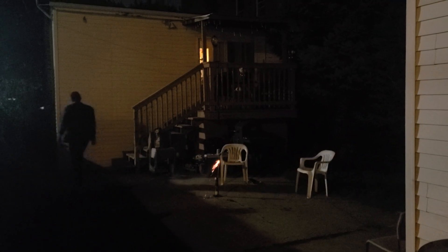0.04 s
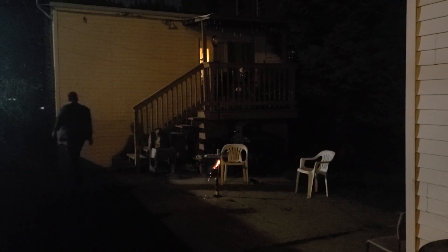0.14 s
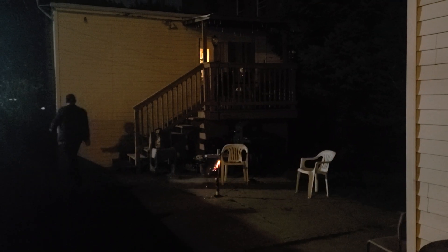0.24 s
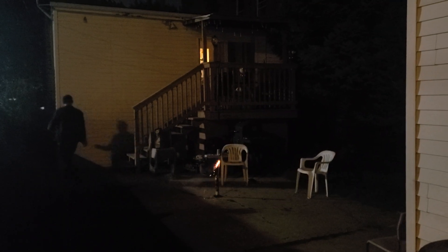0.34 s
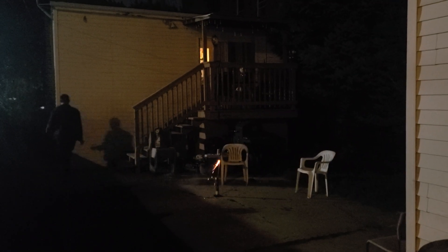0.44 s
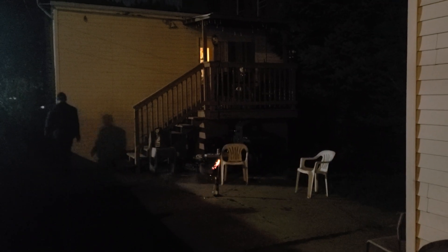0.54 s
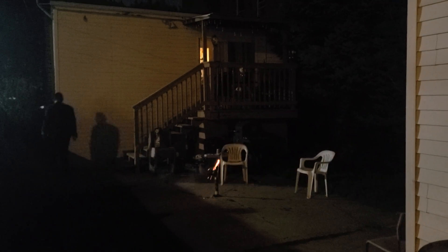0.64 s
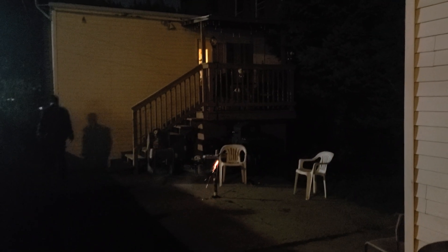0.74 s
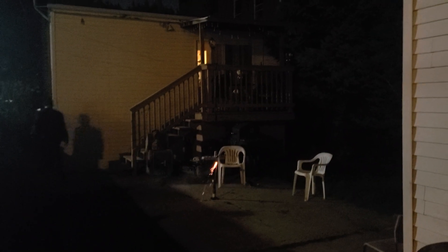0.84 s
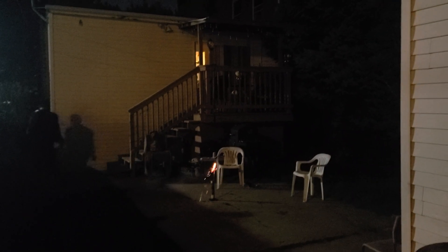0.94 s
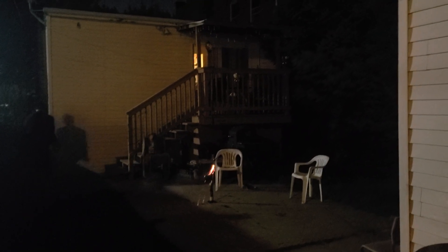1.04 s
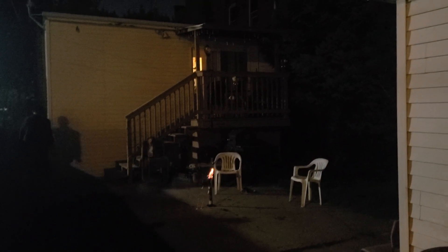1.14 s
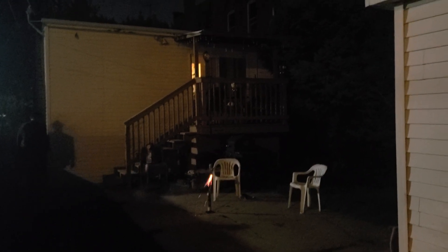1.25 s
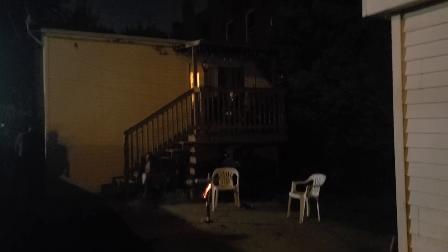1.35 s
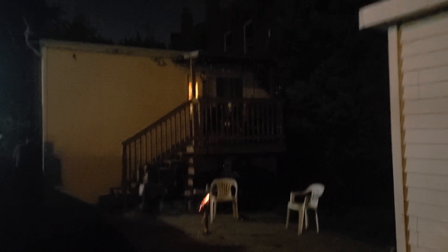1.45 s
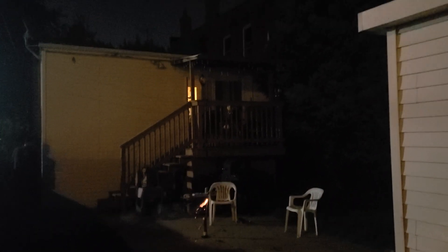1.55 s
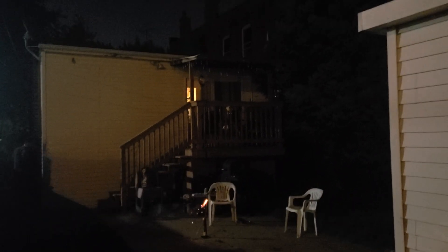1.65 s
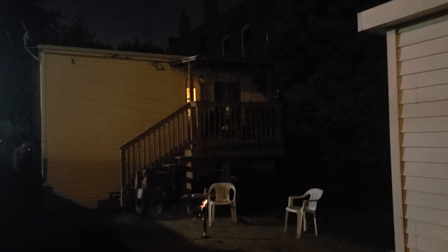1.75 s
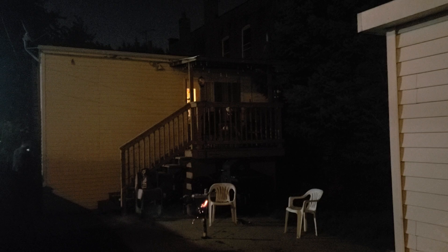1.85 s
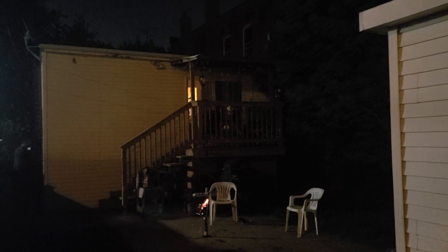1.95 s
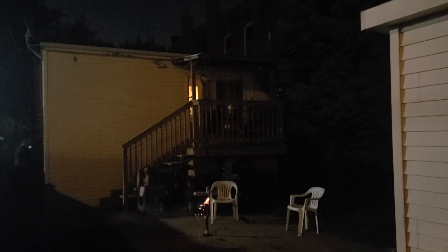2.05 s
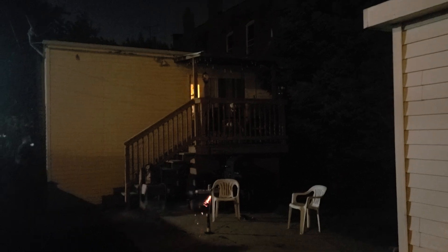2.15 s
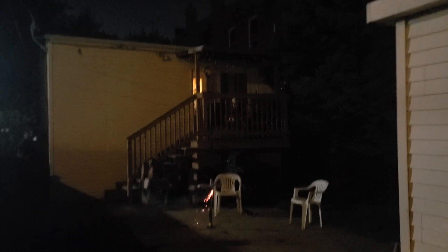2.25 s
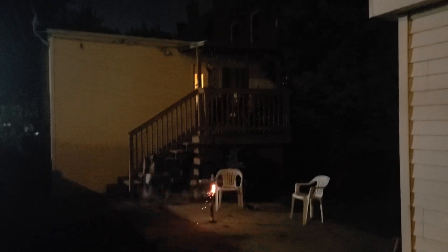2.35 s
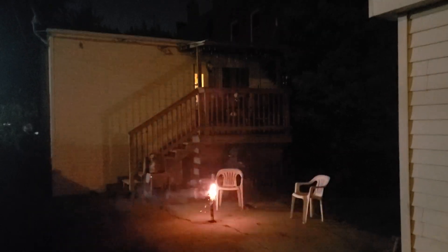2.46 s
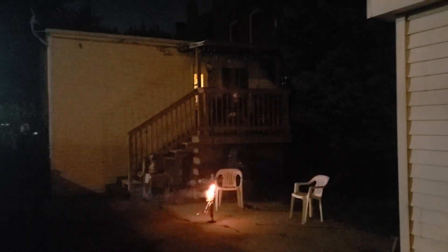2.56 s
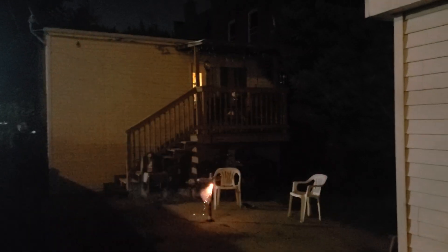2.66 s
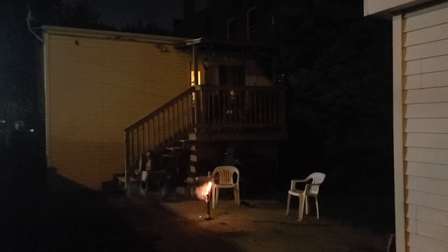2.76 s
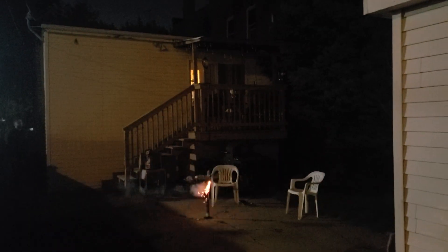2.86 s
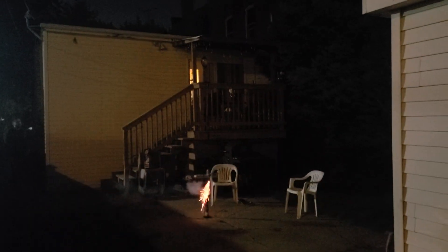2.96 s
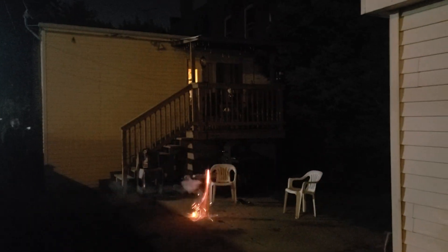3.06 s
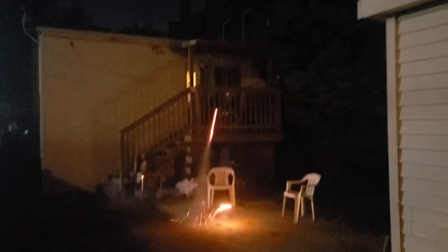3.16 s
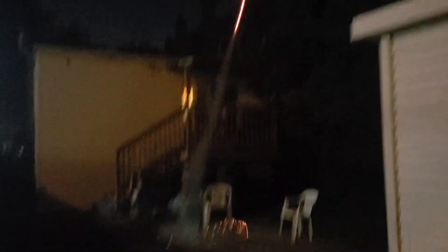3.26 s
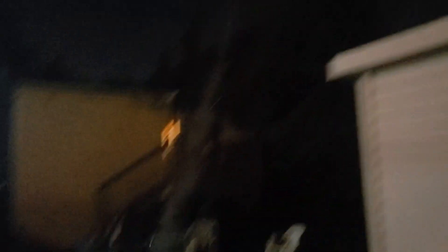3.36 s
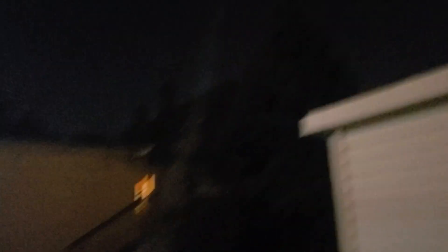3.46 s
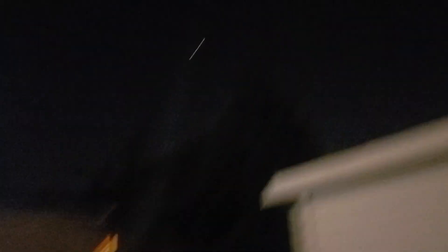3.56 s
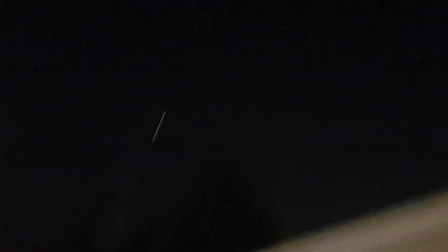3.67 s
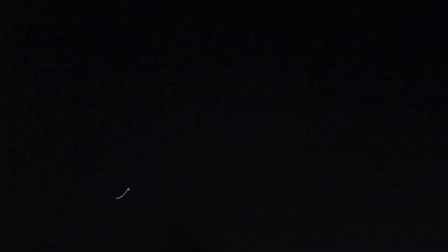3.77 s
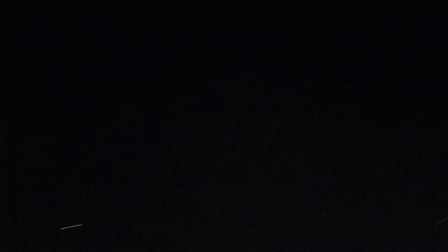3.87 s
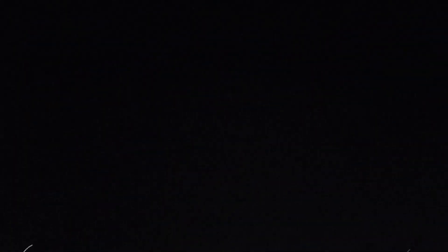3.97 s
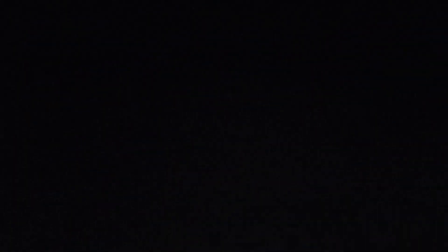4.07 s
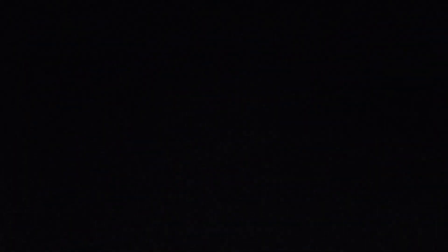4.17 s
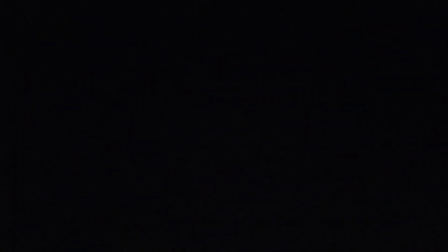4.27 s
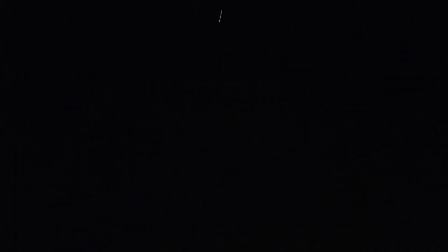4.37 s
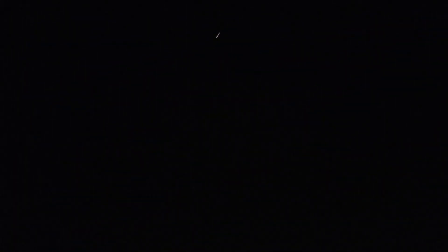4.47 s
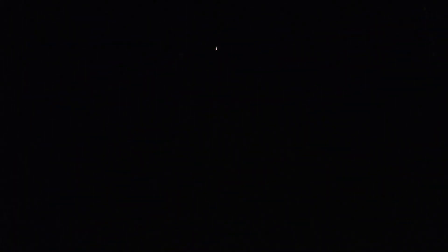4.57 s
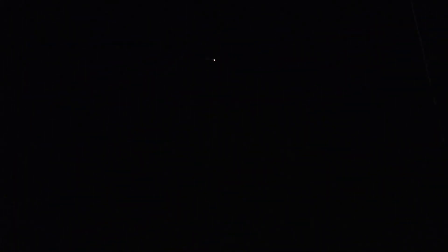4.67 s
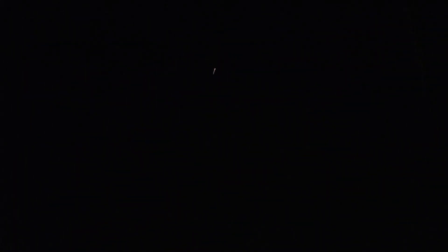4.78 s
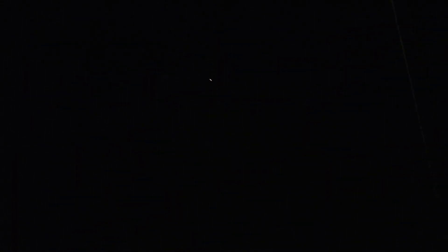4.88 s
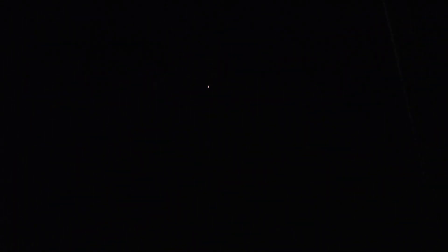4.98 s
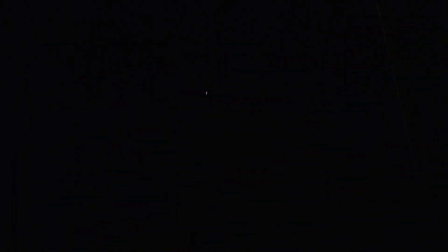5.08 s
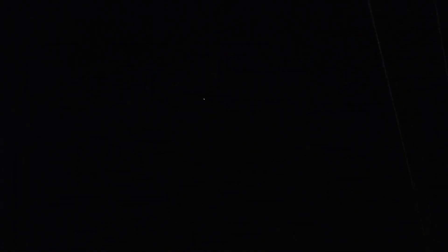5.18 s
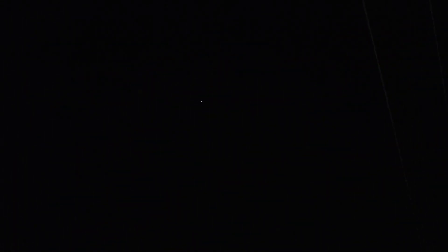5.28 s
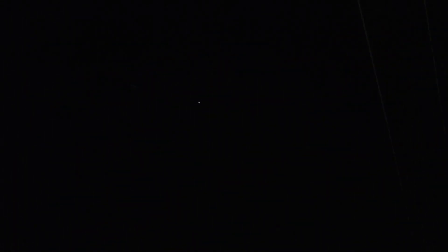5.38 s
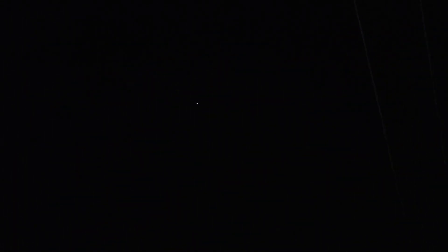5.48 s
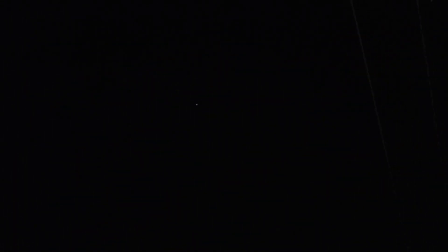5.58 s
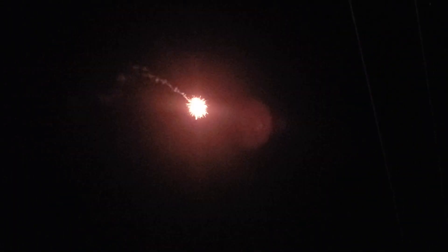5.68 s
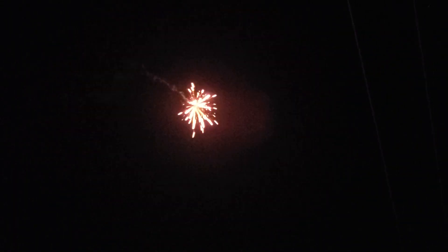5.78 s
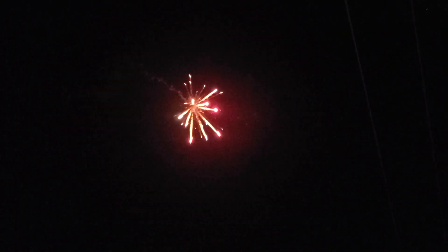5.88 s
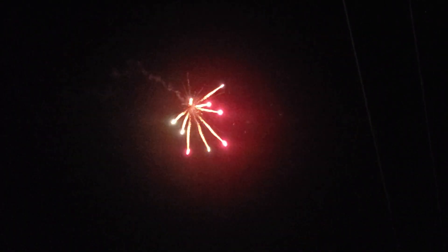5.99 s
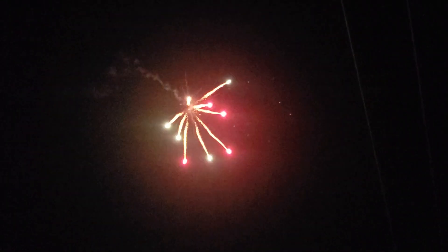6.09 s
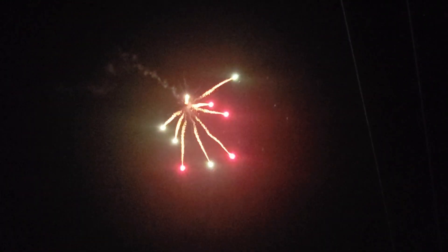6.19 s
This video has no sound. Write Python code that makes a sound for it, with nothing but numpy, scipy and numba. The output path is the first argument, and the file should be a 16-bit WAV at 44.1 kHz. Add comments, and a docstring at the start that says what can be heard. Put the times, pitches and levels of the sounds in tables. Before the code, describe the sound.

In a back yard at night, a fuse hisses and spits softly over low distant traffic rumble, with a brief thin chirr at the start. It flares, then a small rocket launches with a loud, fizzing roar a few metres from the handheld microphone and fades as it climbs. After a quiet gap, one sharp bang cracks overhead, with a deep thump and quick echoes off houses.

```python
"""A fuse hisses and flares in a back yard at night over the rumble of far traffic, with a brief thin chirr at first.
A small rocket's motor then roars a few metres away and climbs off; its shell bursts high up, and the blast
returns from ground and houses. Filtered noise makes the hiss, roar, rumble and echoes; decaying pulses and sines
make the blast, thump, slaps and knocks. A gain control ducks under the roar and creeps back."""
import sys
import numpy as np
from scipy import signal
from scipy.io import wavfile
from scipy.ndimage import uniform_filter1d, map_coordinates
from numba import njit

SR = 44100
rng = np.random.default_rng(int(sys.argv[2]) if len(sys.argv) > 2 else 0)


def int16_out(signal):
    """Quantize to a 16-bit WAV file."""
    q = np.round(np.clip(np.atleast_2d(signal).T, -1, 1) * 32767)
    wavfile.write(sys.argv[1], SR, q.astype(np.int16))


def gain_from_decibels(decibels):
    """Convert decibel values to linear amplitude factors."""
    exponent = np.asarray(decibels, float) / 20
    return 10 ** exponent


N = 274634


def at(table, hz):
    """Log-frequency interpolation: equal musical intervals are equal steps along a spectrum."""
    f, v = np.transpose(table)
    return np.interp(np.log(hz + 1), np.log(f), v)


def curve(table):
    """Linear interpolation: each column becomes one value a sample, -150 outside the table."""
    s, *columns = np.transpose(table)
    return [np.interp(np.arange(N) / SR, s, c, left=-150, right=-150) for c in columns]


def swell(peak_s, db, rise_s, fall_s):
    """Gaussian envelope: about 9 dB down rise_s before its peak and fall_s after."""
    t = np.arange(N) / SR - peak_s
    return gain_from_decibels(db) * np.exp(-(t / np.where(t < 0, rise_s, fall_s)) ** 2)


def sputter(depth_db, grain_s):
    """Random amplitude modulation: powder burns in uneven grains, so the level jumps quickly; rms 1."""
    k = max(int(grain_s * SR), 1)
    grains = gain_from_decibels(depth_db * rng.standard_normal(N // k + 1))
    gain = uniform_filter1d(np.repeat(grains, k), k)[:N]
    return gain / np.sqrt(np.mean(gain ** 2))


def place(out, start_s, sound):
    """Superposition: pressures add where sounds overlap."""
    i = int(start_s * SR)
    out[..., i:i + sound.shape[-1]] += sound


# likeness of the two channels: pitch_hz, correlation (-1 to 1)
LIKENESS = [(60, 0.99), (130, 0.94), (290, 0.92), (640, 0.5), (1410, -0.06), (3100, 0.2), (6820, 0.32),
            (15000, 0.28)]
# balance of the two channels: pitch_hz, left_minus_right_db
LEAN = [(60, 1.5), (110, 1.0), (200, 1.0), (380, 1.5), (700, 3), (1290, 0.0), (2380, -3.5), (4400, 2),
        (8120, 2.5), (15000, 1.5)]


def noise(colour, flicker_db, rate, drift=None, band=(0, SR), size=512, fine=2):
    """Spectral shaping: stereo noise, rms 1 in band before flicker, drift and lean.

    fine patches an octave flicker alone, rate times a second; drift(hz, s) in dB recolours it in time."""
    hz, s, (mid, side) = signal.stft(rng.standard_normal((2, N)), SR, nperseg=size)
    like = np.clip(at(LIKENESS, hz), -.99, .99)[:, None]
    gain = gain_from_decibels(at(colour, hz))[:, None]
    in_band = (hz >= band[0]) & (hz <= band[1])
    gain /= np.sqrt(np.sum((gain ** 2 * (1 + like))[in_band]) / len(hz))
    patches = rng.standard_normal((15 * fine + 2, int(s[-1] * 60) + 2))
    where = np.meshgrid(fine * np.log2(hz + 1), s * min(rate, 59), indexing="ij")
    db = flicker_db * map_coordinates(patches, where, order=1)
    if drift:
        db = db + drift(hz[:, None], s)
    lean = gain_from_decibels(at(LEAN, hz) / 2)[:, None]
    # mid and side in these shares give the wanted correlation
    mid, side = mid * np.sqrt(1 + like), side * np.sqrt(1 - like)
    stereo = np.array([lean * (mid + side), (mid - side) / lean])
    return signal.istft(gain * gain_from_decibels(db) * stereo, SR)[1][:, :N]


# spectrum of the far town: pitch_hz, relative_density_db (per Hz)
TOWN_COLOUR = [(18, -35), (30, -10), (82, 1), (119, -7.5), (157, -9), (232, -13), (271, -15), (453, -25),
               (1190, -31), (1790, -32.5), (3300, -43.5), (4290, -76), (7260, -120)]


def town():
    """Low-pass noise: far traffic keeps mostly its rumble, and a rush of tyres swells and passes."""
    def rush(hz, s):
        octaves_off = np.log2((hz + 1) / 1600)
        return np.interp(s, (4.7, 4.85, 5.9), (0, 7, 2.5)) * np.exp(-(octaves_off / .6) ** 2)
    return gain_from_decibels(-43) * noise(TOWN_COLOUR, 2.0, 6, rush, size=4096)


# spectrum of the circuit's own hiss: pitch_hz, relative_density_db (per Hz)
CIRCUIT_COLOUR = [(500, -30), (900, -6.5), (1750, -7), (3100, -12.5), (4400, 0), (7250, -1), (8500, -9),
                  (15700, -16.5)]


def circuit_hiss():
    """Electronic noise: a faint steady floor from the circuit itself."""
    return gain_from_decibels(-79.5) * noise(CIRCUIT_COLOUR, 0.71, 4.0)


# spectrum of the chirr: pitch_hz, relative_density_db (per Hz)
CHIRR_COLOUR = [(3200, -30), (3550, 3), (3750, -9), (4200, -7), (4500, -26)]


def chirr():
    """Band-limited noise burst: a brief thin chirr."""
    return swell(.055, -52, rise_s=.06, fall_s=.045) * noise(CHIRR_COLOUR, 1.5, 20)


# burning fuse: time_s, burn_db, hidden_share (0-1, flame hidden under the rocket)
FUSE = [(0.0, 0, 0), (0.32, -3.5, 0), (1.55, 0.5, 0.12), (1.93, 3.5, 0.95), (2.38, 3.5, 0.66),
        (2.42, 4, .9), (2.46, 11.5, 0.6), (2.56, 5, .45), (2.65, -3, 0.5), (2.75, 1.5, .35), (3.0, 6, 0.7)]
# powder flaring up: peak_s, level_db
FLARES = [(2.55, -49.5), (3.0, -57.5)]
# spectra of the mid hiss, fine sizzle, lower flare and hollow nozzle: pitch_hz, relative_density_db (per Hz)
HISS_COLOUR = [(880, -55), (1500, -13), (2770, -0.5), (3170, -6), (3770, -0.5), (5740, -4), (6230, -5.5),
               (9000, -22.5), (11700, -61), (19800, -120)]
SIZZLE_COLOUR = [(4410, -31), (7500, -4), (8360, -11.5), (10500, -11.5), (11600, -2), (12300, -0.5),
                 (15700, -3)]
FLARE_COLOUR = [(300, -28), (700, 0), (2000, -1.5), (4000, -22.5)]
NOZZLE_COLOUR = [(5000, -26), (5900, -9), (6300, 0), (6750, -3), (7100, -9), (8000, -11), (8400, -25)]


def fuse():
    """Combustion noise: spitting powder hisses, sizzles and flares, and resonance rings in the nozzle."""
    burn_db, hidden = curve(FUSE)
    t = np.arange(N) / SR
    near = np.interp(t, [2.16, 2.45], [0, 1])  # the flame creeps up to the nozzle, which rings louder
    # the sizzle follows the burn only in part and is lost as the flame hides
    sizzle_db = -49 + 0.37 * burn_db - 14.5 * np.clip(hidden, 0, 1)
    flare = gain_from_decibels(-62) + sum(swell(s, db, rise_s=0.07, fall_s=0.054) for s, db in FLARES)
    burn = gain_from_decibels(-56.5 + burn_db) * noise(HISS_COLOUR, 0.86, 12)
    burn += gain_from_decibels(sizzle_db) * noise(SIZZLE_COLOUR, 0.86, 12)
    burn += flare * noise(FLARE_COLOUR, 0.86, 12)
    burn += gain_from_decibels(-63.5 + burn_db + 10 * near) * noise(NOZZLE_COLOUR, 0.86, 12)
    lit = t <= FUSE[-1][0]
    return lit * sputter(.8, 0.0046) * burn


# lone sparks: start_s, level_db
SPARKS = [(1.67, -28.5)]


def sparks():
    """Impulsive noise: each spark is a click of noise that dies exponentially."""
    out, t = np.zeros((2, N)), np.arange(SR // 100) / SR
    for s, db in SPARKS:
        grain = uniform_filter1d(rng.standard_normal((2, len(t))), size=4)
        place(out, s, gain_from_decibels(db - 60 * t / 0.013) * grain)
    return out


def off_ground(x):
    """Comb filtering: the ground sends the hiss again a moment later, which combs it into bands."""
    lag = int(0.84 * SR / 1000)  # 0.84 ms
    out = x.copy()
    out[:, lag:] += gain_from_decibels(-14.5) * x[:, :-lag]
    return out


def yard(x):
    """Reverberation: walls, stairs and chairs return a short dense echo that ripples the spectrum finely."""
    echo_db, t60_s = -4, .12
    t = np.arange(SR // 8) / SR
    echo = rng.standard_normal((2, len(t))) * gain_from_decibels(-60 * t / t60_s) * (t > .003)
    echo *= gain_from_decibels(echo_db) / np.sqrt(np.sum(echo ** 2, axis=1, keepdims=True))
    wet = x + signal.fftconvolve(x, echo, axes=1)[:, :N]
    return wet / np.sqrt(1 + gain_from_decibels(echo_db) ** 2)  # keeps the power about the same


# small knocks on wood: start_s, level_db
KNOCKS = [(1.197, -47), (4.606, -38.5)]
# modes of the wood: pitch_hz, level_db, t60_s
WOOD = [(690, 0, 0.07), (767, -4, 0.05), (1050, -12, .03), (1740, -13, .04)]


def knocks():
    """Modal resonance: each tap rings the same few decaying wooden modes."""
    out, t = np.zeros(N), np.arange(SR // 8) / SR
    ring = sum(gain_from_decibels(db - 60 * t / t60) * np.sin(2 * np.pi * hz * t) for hz, db, t60 in WOOD)
    for s, db in KNOCKS:
        place(out, s, gain_from_decibels(db) * ring)
    return out


# motor under thrust, up to burnout: time_s, level_db (5.5-7.5 kHz), fizz_db (sparks)
JET = [(2.99, -60.5, -15), (3.021, -38.5, -6), (3.052, -27, -5.5), (3.092, -24, 3), (3.17, -8.5, 7.5),
       (3.21, -2.5, 3), (3.27, 3.5, 0.5), (3.38, 6, 2.5), (3.442, 2.5, 1.5)]
# spectra of the jet and of the hooting tube: pitch_hz, relative_density_db (per Hz)
JET_COLOUR = [(59, -48.5), (100, -18), (185, -15.5), (387, -14.5), (604, -17.5), (686, -12.5), (1890, -6),
              (2060, -2.5), (3150, -6.5), (3650, -1.5), (5230, -4.5), (6590, 1.5), (8870, -10.5),
              (11700, -5.5), (15700, -2)]
TUBE_COLOUR = [(260, -24), (330, -4.5), (380, -3.5), (420, -4.5), (520, -21)]


def motor():
    """Turbulent jet noise: thin and fizzing, fuller as the exhaust turns this way, dull once far off."""
    s, db, fizz_db = np.transpose(JET)

    def after(t):  # seconds since burnout
        return np.clip(t - s[-1], 0, None)

    def decades(t):  # after burnout the sound dies as a power of time
        return np.log10(1 + after(t) / 0.031)

    def roar(t):
        facing_db = np.interp(t, s[[0, -1]], [-6.5, 1.5])
        # the roar outlasts the rest for a while, most of all 0.38 s after burnout
        late = after(t) / 0.38
        return facing_db + 2.5 * late * np.exp(1 - late)

    def fizz(t):  # the top fades faster than the rest
        return np.interp(t, s, fizz_db) - 6 * decades(t)

    def turn(hz, t):
        low = np.clip((5800 - hz) / 1500, 0, 1)
        high = np.clip((hz - 8000) / 4000, 0, 1)
        return roar(t) * low + fizz(t) * high

    jet = noise(JET_COLOUR, 2.0, 40, turn, band=(5500, 7500), fine=5) * sputter(1.4, .003)
    t = np.arange(N) / SR
    level_db = np.interp(t, s, db, left=-150) - 38.5 * decades(t) - 8 * after(t)
    # the tube hoots from the time the rocket slides until it leaves, with soft edges
    slides_s, leaves_s, edge_s = 3.115, 3.19, 0.015
    in_tube = np.exp(-((t - np.clip(t, slides_s, leaves_s)) / edge_s) ** 2)
    hoot = gain_from_decibels(-10) * in_tube * noise(TUBE_COLOUR, 1.2, 10, size=2048)
    return gain_from_decibels(level_db) * (jet + hoot)


def thump():
    """Damped oscillation: the burst's deep pressure swings to and fro and dies away."""
    out, t = np.zeros((2, N)), np.arange(SR // 5) / SR
    level_db = 19 + np.array([[-.8], [.8]]) - 60 * t / 0.088
    swing = (1 - np.exp(-t / .011)) * np.sin(2 * np.pi * 58 * t)
    place(out, 5.9612, gain_from_decibels(level_db) * swing)
    return out


# blast arrivals: start_s, left_db, right_db, fall_ms, sign
BLAST = [(5.9618, 13.5, 9.5, .9, -1), (5.9621, 3, 10.5, 1.0, -1), (5.9722, 11, 13, .3, 1),
         (5.9726, 6, 12, 1.1, -1), (5.9747, 5, 4, .4, 1)]


def shock_fronts():
    """Blast wave: each arrival is a steep front, then the pressure falls away exponentially."""
    out, t = np.zeros((2, N)), np.arange(SR // 5) / SR
    for s, left_db, right_db, ms, sign in BLAST:
        push = np.exp(-t * 1000 / ms) * (1 - np.exp(-t / 6e-5))
        place(out, s, sign * gain_from_decibels(np.array([[left_db], [right_db]])) * push)
    return out


# spectrum of the scattered echoes: pitch_hz, relative_density_db (per Hz)
ECHO_COLOUR = [(24, -54.5), (40, -18), (75, -9.5), (193, -5), (399, -2), (850, -4), (1200, -16),
               (2290, -16), (3970, -17), (5230, -21), (7060, -21.5), (8410, -31), (15700, -23.5)]
# decay of the scattered echoes: pitch_hz, t60_s
ECHO_T60 = [(60, .14), (160, 0.4), (420, 0.75), (1100, 0.84), (2900, 0.9), (7700, 0.68), (15000, .58)]


def echoes():
    """Diffuse scattering: houses and trees return the blast as noise, each pitch dying at its own rate."""
    start_s = 5.962

    def fade(hz, s):
        return -60 * np.clip(s - start_s, 0, None) / at(ECHO_T60, hz)
    # few echoes before the ground's, save a first flash; then they crowd in
    since = np.arange(N) / SR - start_s
    rise = np.interp(since, [0, .001, .003, .01, .013], [0, .8, .15, .15, .9])
    return gain_from_decibels(-8.5) * rise * noise(ECHO_COLOUR, 3, 40, fade, fine=4)


# slaps from single far walls: start_s, level_db (varied at random per channel), pitch_hz
SLAPS = [(5.995, -4, 597), (6.014, -1, 380), (6.043, -6, 363), (6.055, -11, 510), (6.079, -13, 474)]


def slaps():
    """Specular reflection: single far walls slap back dully, each a short damped tone."""
    out, t = np.zeros((2, N)), np.arange(SR // 20) / SR
    for s, db, hz in SLAPS:
        level_db = db + 2.8 * rng.standard_normal((2, 1)) - 60 * t / 0.025
        place(out, s, gain_from_decibels(level_db) * np.sin(2 * np.pi * hz * t))
    return out


def scene():
    """Superposition: everything in the yard adds to the town's rumble."""
    burning = off_ground(fuse() + sparks())
    burst = thump() + shock_fronts() + echoes() + slaps()
    return town() + chirr() + yard(burning + motor()) + knocks() + burst


@njit
def ride(over_db, attack, hold, release_db):
    """Feed-forward compression: gain in dB falls fast to the top level, waits, then climbs evenly."""
    out, g, wait = np.empty(len(over_db)), 0., 0.
    for i in range(len(over_db)):
        if -over_db[i] < g:
            g, wait = g + attack * (-over_db[i] - g), hold
        elif wait > 0:
            wait -= 1
        else:
            g = min(g + release_db, 0.)
        out[i] = g
    return out


def gain_control(dry):
    """Automatic gain control: the running power of both channels sets one gain for both."""
    top_db, attack_s, hold_s, release_db_s = -11.7, 0.0083, 0.82, 8.5
    keep = np.exp(-1 / (0.0065 * SR))  # power is averaged over 6.5 ms
    power = signal.lfilter([1 - keep], [1, -keep], np.mean(dry ** 2, axis=0))
    over_db = 10 * np.log10(power + 1e-18) - top_db
    return dry * gain_from_decibels(ride(over_db, 1 / (attack_s * SR), hold_s * SR, release_db_s / SR))


def top_cut(x):
    """Nothing passes above the cut-off."""
    return signal.sosfilt(signal.butter(12, 17090, fs=SR, output="sos"), x)


def record(dry):
    """Signal chain: gain control, the circuit's own hiss, clipping and a steep low-pass cut of the top."""
    heard = gain_control(dry) + circuit_hiss()
    cut = signal.ellip(10, .2, 80, 15680, fs=SR, output="sos")
    mix = signal.sosfilt(cut, np.clip(heard, -.95, .95))
    return top_cut(np.clip(mix, -1, 1))


dry = scene()
out = record(dry)
int16_out(out)
```